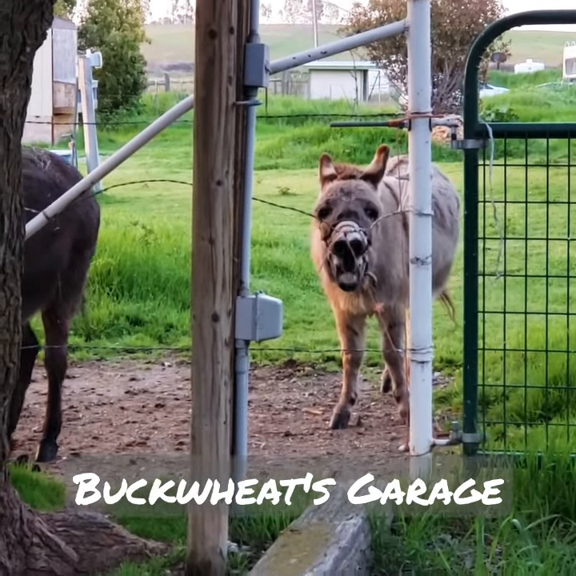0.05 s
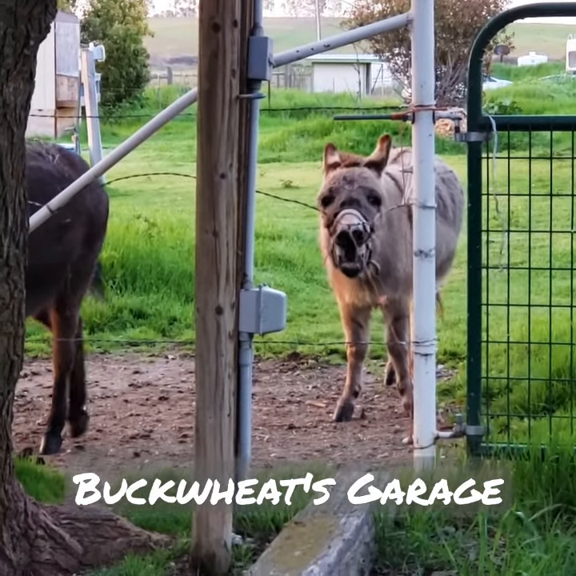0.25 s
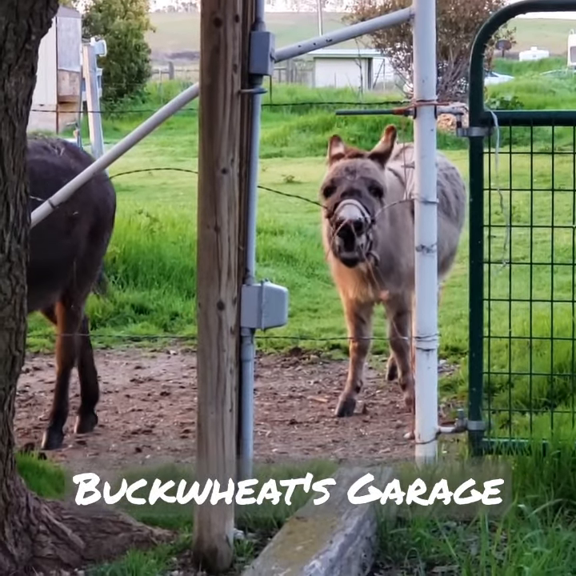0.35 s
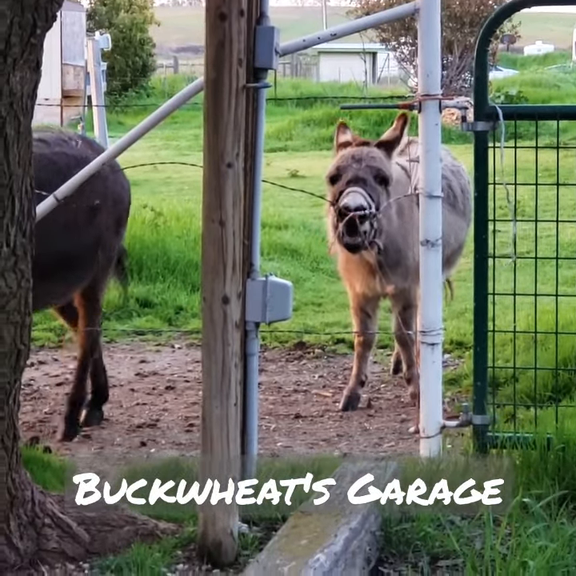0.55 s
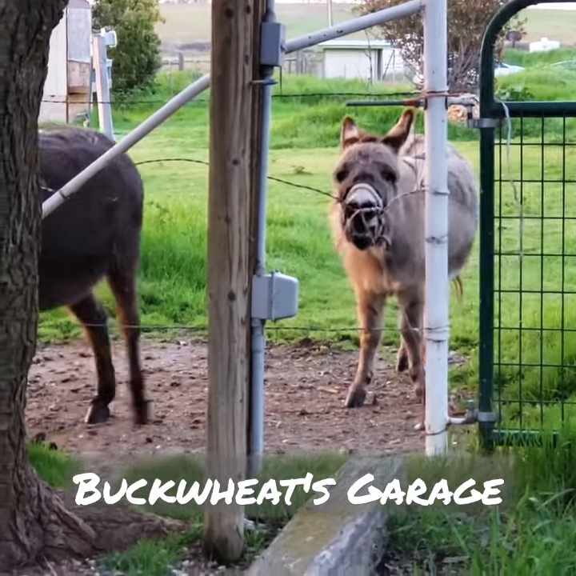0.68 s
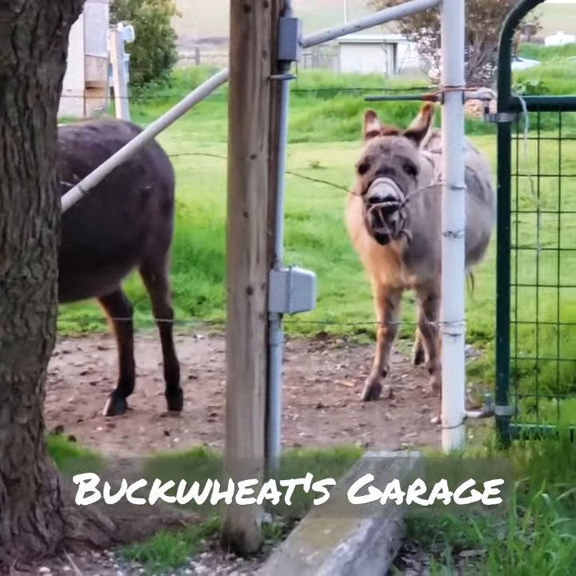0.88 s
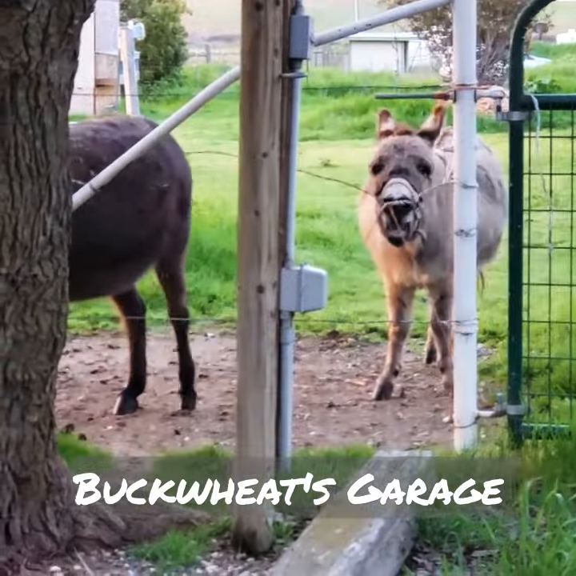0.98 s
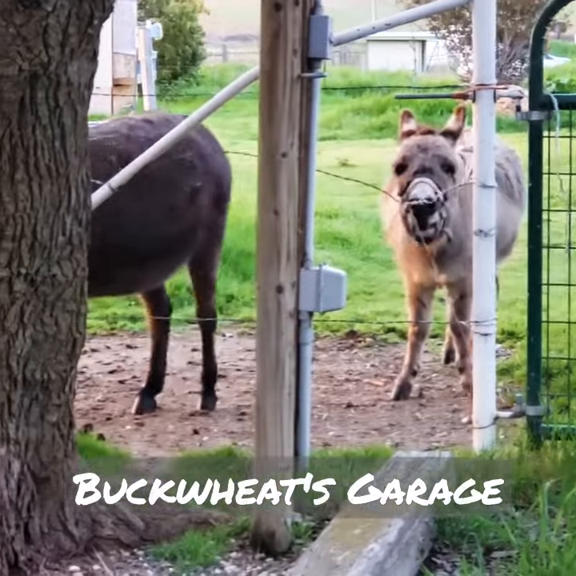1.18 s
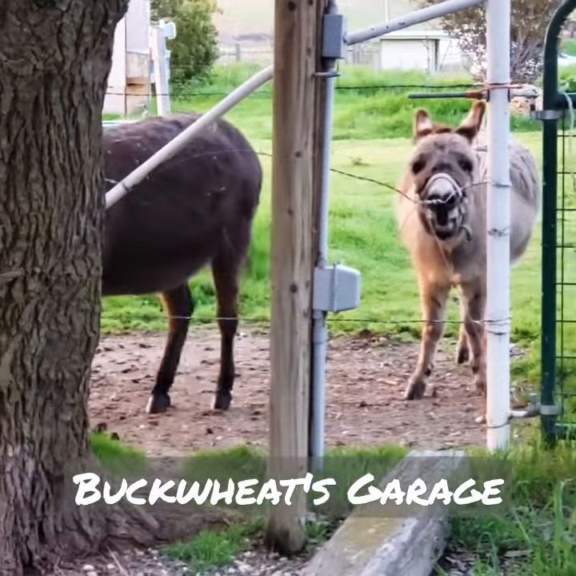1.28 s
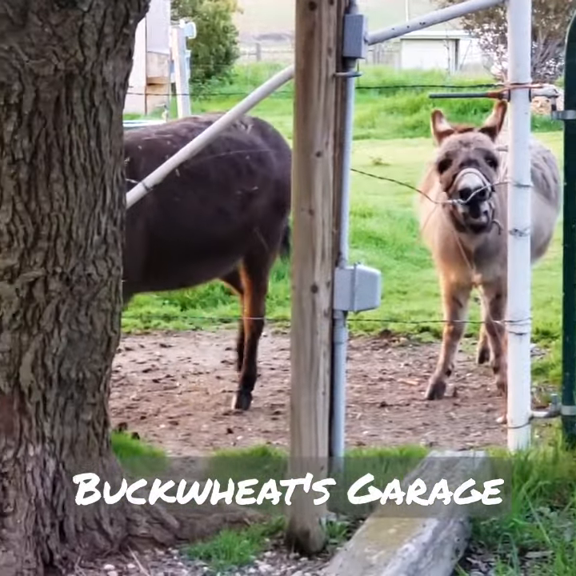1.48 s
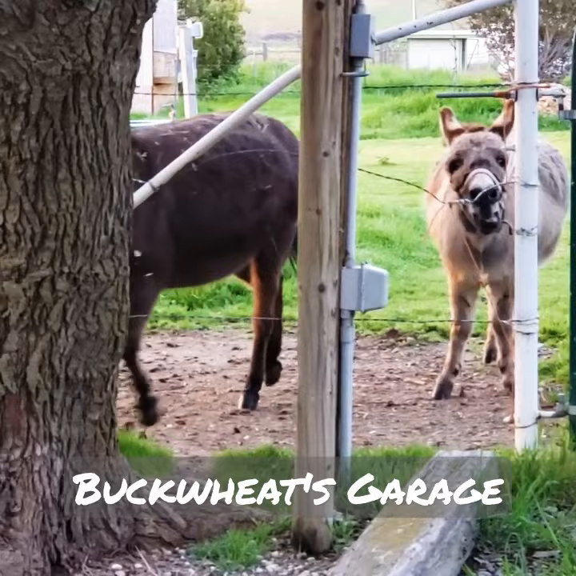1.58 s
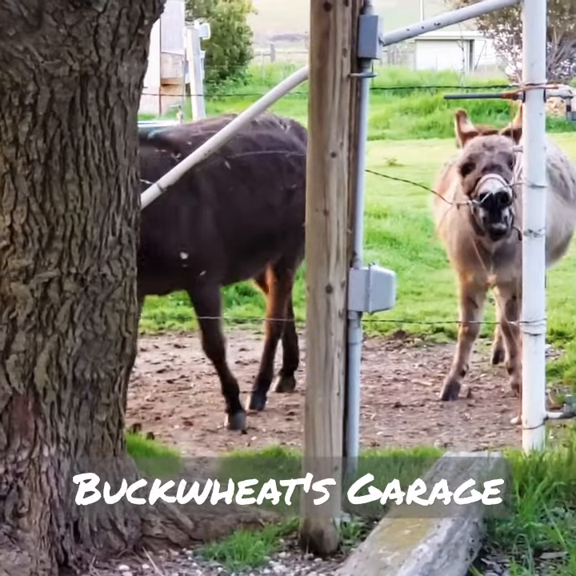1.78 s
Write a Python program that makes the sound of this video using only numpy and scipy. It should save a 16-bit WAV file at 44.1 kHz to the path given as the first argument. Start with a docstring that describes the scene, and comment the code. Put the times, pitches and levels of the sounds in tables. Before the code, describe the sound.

A donkey brays a few metres away in an open paddock. A short grunt leads into a loud, rough haw, a shrill wheezing in-breath and a longer haw, with a faint echo and a low outdoor rumble.

```python
"""A donkey brays in an open paddock, a few metres away: a short grunt, a haw, a shrill hee, a longer haw.
In each haw the vocal folds start slack, jump to a pressed register where every second cycle differs,
then drop back. The hee is breath drawn in: two throat whistles that grow hoarse over rushing air.
Sheds and trees give a faint echo, and a low rumble lies beneath."""
import sys
import numpy as np
from scipy import signal
from scipy.fft import rfft, irfft, next_fast_len
from scipy.io import wavfile

SR = 44100
rng = np.random.default_rng(int(sys.argv[2]) if len(sys.argv) > 2 else 0)


def transcribe(u):
    """Save the signal u as a 16-bit wav file named by the first command-line argument.

    u: samples, shape (n,) or (channels, n), limited to [-1, 1]; the rate is SR.
    q: integer samples, one column per channel.
    """
    v = np.clip(np.atleast_2d(u).T, -1, 1)
    q = np.round(v * 32767).astype(np.int16)
    wavfile.write(sys.argv[1], SR, q)


N = 81585
T = np.arange(N) / SR


def from_db(db):
    """Decibels to gain."""
    return 10 ** (np.asarray(db) / 20)


def unit_rms(x):
    """Scale to unit level."""
    return x / np.sqrt(np.mean(x ** 2) + 1e-20)


def automation(rows):
    """Draw one line per column through the breakpoints, at every sample."""
    times, *columns = np.transpose(rows)
    return [np.interp(T, times, column) for column in columns]


def gate(rows, fade_s=0.003):
    """Fade in after a table's first time and out before its last."""
    times = np.reshape(rows, (len(rows), -1))[:, 0]
    return np.clip(np.minimum(T - times[0], times[-1] - T) / fade_s, 0, 1)


def at_hz(points, hz):
    """Read a curve on a log-frequency axis."""
    freqs, values = np.transpose(points)
    return np.interp(np.log(np.maximum(hz, 1)), np.log(freqs), values)


def filtered(x, response):
    """Apply a frequency response, given as a function of Hz."""
    size = next_fast_len(2 * N)
    hz = np.arange(size // 2 + 1) * SR / size
    return irfft(rfft(x, size) * response(hz), size)[..., :N]


def coloured(x, eq):
    """Shape a signal with an EQ curve, then bring it to unit level."""
    return unit_rms(filtered(x, lambda hz: from_db(at_hz(eq, hz))))


def drift(rate_hz):
    """Smooth random wobble at unit level."""
    return unit_rms(filtered(rng.standard_normal(N), lambda hz: 1 / (1 + (hz / rate_hz) ** 4)))


def shaky_phase(hz, jitter, rate_hz):
    """Phase of an oscillator whose pitch trembles."""
    return 2 * np.pi * np.cumsum(hz * (1 + jitter * drift(rate_hz))) / SR


# The rumble's tone. Each row: frequency in Hz, relative level in dB.
RUMBLE_EQ = [(25, -19), (62, 4.5), (140, -13), (700, -29.5), (2000, -23.5), (16000, -52)]


def rumble(level_db=-57.5, width=0.63):
    """A low outdoor bed, mostly shared by left and right."""
    air = rng.standard_normal(N) + width * rng.standard_normal((2, N))
    return from_db(level_db + 0.5 * drift(21)) * coloured(air, RUMBLE_EQ)


# The echoes come back dark. Each row: frequency in Hz, gain in dB on top of the send.
ECHO_EQ = [(250, 8), (2200, 1), (5000, -7), (16000, -16.5)]


def paddock_echo(x, send_db=-20, t60_s=0.62, onset_s=0.005, shed_s=.14, shed_db=-13):
    """Scattered echoes from fence and trees, and a distinct slap from a shed."""
    decay = from_db(-60 * T / t60_s) * (1 - np.exp(-T / onset_s))
    echoes = unit_rms(rng.standard_normal((2, N)) * decay) / np.sqrt(N)
    echoes[:, int(shed_s * SR)] += from_db(shed_db)   # relative to the scatter
    wet = signal.fftconvolve(x[None], echoes, axes=1)[:, :N]
    return filtered(wet, lambda hz: from_db(send_db + at_hz(ECHO_EQ, hz)))


# Where haw and hee sit in the image. Each row: frequency in Hz, left minus right in dB.
HAW_PAN = [(330, 4), (1000, 3), (1330, -1.5), (2250, 5), (2650, -5.5), (3000, -2.5), (3600, -11),
           (7200, -0.5), (15000, -5.5)]
HEE_PAN = [(2100, 1), (2750, -8.5), (3100, -3), (3650, -8), (4700, -3.5), (5200, -13.5), (5700, 2),
           (12300, -5), (15200, 5.5)]
# The spread they share. Each row: frequency in Hz, left minus right phase in radians.
STEREO_PHASE = [(600, 0.25), (1300, -1.05), (2200, -1.54), (5200, -0.79), (10500, -1.68)]
# One entry per haw: extra delay of the left side in seconds.
HAW_LAG_S = [-0.0000018, .00001]


def panned(x, pan, lag_s=0):
    """A source reaches left and right with different level and phase."""
    def response(hz):
        phase = at_hz(STEREO_PHASE, hz) - 2 * np.pi * hz * lag_s
        left = from_db(at_hz(pan, hz) / 2) * np.exp(.5j * phase)
        pair = np.array([left, 1 / left])
        return pair / np.maximum(abs(pair.mean(0)), .5)   # holds the centre level
    return filtered(x, response)


# The grunt's envelope. Each row: time in seconds, level in dB.
GRUNT_LEVEL = [(.033, -71.5), (.04, -39), (.053, -38.5), (.07, -44.5), (.094, -51.5)]
# Its throaty tone. Each row: frequency in Hz, relative level in dB.
GRUNT_EQ = [(120, -15.5), (250, -1), (380, -19), (600, -14), (850, -0.5), (1200, -4.5), (1550, -24.5),
            (2100, -6.5), (5200, -21), (16000, -32.5)]


def grunt(flap_hz=401.7, air=0.11):
    """The folds flap unevenly for a moment without finding a pitch."""
    db, = automation(GRUNT_LEVEL)
    flap_count = shaky_phase(flap_hz, jitter=0.15, rate_hz=220) // (2 * np.pi)
    flaps = np.diff(flap_count, prepend=0) * from_db(1.6 * drift(336))
    return gate(GRUNT_LEVEL) * from_db(db) * coloured(flaps + air * rng.standard_normal(N), GRUNT_EQ)


# Chirps at the edges of the haws. Each row: centre in seconds, landing pitch in Hz, level in dB,
# width in seconds, upward glide in Hz.
THROAT_CATCHES = [(0.181, 800, -37, 0.0034, -0.5), (0.53, 1950, -39.5, .005, 122.5),
                  (1.13, 1230, -35, 0.0032, -61.5), (1.757, 1320, -38.5, 0.0028, 59.5),
                  (1.767, 775, -31, 0.01, 119.5)]


def throat_catch(centre_s, landing_hz, db, width_s, glide_hz):
    """A brief sliding note as the throat snaps open or shut."""
    age = (T - centre_s) / width_s
    hz = landing_hz + glide_hz * np.clip(age + .5, -1, 0)
    return from_db(db) * np.sqrt(2) * np.sin(shaky_phase(hz, jitter=0.015, rate_hz=110)) / np.cosh(age)


# The tone of the in-breath. Each row: frequency in Hz, relative level in dB.
WHEEZE_EQ = [(400, -35.5), (950, -14.5), (1450, -24), (1750, -13.5), (2020, 2.5), (2750, -3.5), (3080, 4),
             (3550, -19.5), (4000, 3), (4350, -7), (4800, 2.5), (5400, 0.5), (5950, -11), (6500, -46),
             (7500, -17), (8900, -35), (10400, -21.5), (14200, -22), (15200, -24), (16000, -26.5)]


def wheeze(envelope, roughness=0.21):
    """Inrushing air rings the resonances of throat and mouth."""
    db, = automation(envelope)
    air = rng.standard_normal(N) * (1 + roughness * drift(280))
    return gate(envelope) * from_db(db) * coloured(air, WHEEZE_EQ)


def whistle(curve, jitter=0.0044, flutter=0.057):
    """Air sings in the narrowed throat, fluttering in pitch and strength; returns a rotating phasor."""
    hz, db = automation(curve)
    tremolo = unit_rms(np.abs(1 + flutter * drift(70)))
    phase = shaky_phase(hz, jitter, rate_hz=180)
    return np.sqrt(2) * gate(curve) * from_db(db) * tremolo * np.exp(1j * phase)


def turbulence(share, width_hz=168):
    """A modulator that spreads a share of a tone's power into a noisy band around it."""
    share = np.clip(share, 0, 1)
    return np.sqrt(1 - share) + np.sqrt(share / 2) * (drift(width_hz) + 1j * drift(width_hz))


# The hee's two whistles, and the fading one that opens the scene.
# Each row: time in seconds, pitch in Hz, level in dB.
HIGH_WHISTLE = [(.648, 5840, -48.5), (.661, 5600, -34), (.674, 5350, -18.5), (.69, 5265, -20),
                (.725, 5270, -13.5), (.76, 5168, -14.5), (.803, 5158, -15.5), (.845, 4967, -24.5),
                (.895, 4780, -27), (.94, 4774, -27.5), (.975, 4996, -36), (1.015, 5320, -72)]
LOW_WHISTLE = [(.672, 2734, -42), (.692, 2667, -21), (.705, 2400, -30.5), (.73, 2266, -28.5),
               (.785, 2048, -32), (.84, 2014, -23.5), (.895, 1953, -35.5), (.95, 2383, -34.5),
               (.975, 2340, -71)]
OPENING_WHISTLE = [(0, 5330, -47), (.035, 5250, -51.5), (.16, 5330, -72)]
# The breath under the hee and under the opening whistle. Each row: time in seconds, level in dB.
HEE_BREATH = [(.635, -63), (.675, -39), (.7, -25.5), (.75, -23.5), (.81, -24), (.87, -28), (.935, -28),
              (.965, -37), (.995, -52.5), (1.035, -77)]
OPENING_BREATH = [(0, -43.5), (.03, -53.5), (.08, -52.5), (.16, -77.5)]
# The high whistle breaks up as breath runs out. Each row: time in seconds, noisy share from 0 to 1.
HOARSENESS = [(.69, 0.1), (.71, 0.4), (.805, 0), (.84, 0.3)]
# Octave, twelfth and sum tone. Each row: mix gain in dB, width of the rasp in Hz.
HEE_OVERTONES = [(-10, 310), (-3.5, 380), (-18.5, 110)]


def hee(overtone_rasp=.85, low_hoarser=3):
    """Two hoarse whistles and their overtones ride the in-breath; an earlier hee dies away at the start."""
    high, low = whistle(HIGH_WHISTLE), whistle(LOW_WHISTLE, jitter=0.0179)
    hoarse, = automation(HOARSENESS)
    _, high_db = automation(HIGH_WHISTLE)
    # Ring modulation makes the overtones swell faster than the whistle itself.
    swing = np.sqrt(2) * from_db(high_db) * np.exp(1j * np.angle(high))
    low_swing = abs(swing) * gate(LOW_WHISTLE) * np.exp(1j * np.angle(low))
    overtones = sum(from_db(gain_db) * high * partner * turbulence(overtone_rasp, width_hz)
                    for (gain_db, width_hz), partner in zip(HEE_OVERTONES, (swing, swing ** 2, low_swing)))
    tones = high * turbulence(hoarse) + low * turbulence(low_hoarser * hoarse) + overtones
    opening = whistle(OPENING_WHISTLE) * turbulence(0.3)
    return (tones + opening).real + wheeze(HEE_BREATH) + wheeze(OPENING_BREATH)


# Cues for the two haws. Each row: start, jump up, drop back and end, all in seconds.
HAW_CUES = [(0.174, 0.182, 0.44, .532), (1.124, 1.166, 1.564, 1.763)]
# Each haw's pressed stretch. Each row: pitch in Hz, sag in Hz per second, scoop from below in Hz,
# level in dB, swell in dB per second, softening of the attack in dB.
PRESSED_NOTES = [(699.8, 215, 72, -19, -4, 10), (677.5, 103, 35.6, -23, -1.5, 1)]
# Its slack stretch. Each row: pitch in Hz, sag in Hz per second, level in dB, fade in dB per second.
SLACK_NOTES = [(581.4, 68, -24, 146), (572, 170, -31.5, 50.5)]


def vocal_effort(which, break_s=0.0025, settle_s=0.02068, lift_hz=83, lift_s=0.025):
    """The folds' register (0 slack, 1 pressed), pitch and level through one haw."""
    start, up, down, end = HAW_CUES[which]
    top_hz, sag, scoop_hz, top_db, swell, soft_db = PRESSED_NOTES[which]
    slack_hz, slack_sag, slack_db, fade = SLACK_NOTES[which]
    t = np.clip(T, start, end)
    pressed = (np.tanh((t - up) / break_s / 2) - np.tanh((t - down) / break_s / 2)) / 2
    since_up, since_down = np.maximum(t - up, 0), np.maximum(t - down, 0)
    unsettled = np.exp(-since_up / settle_s)
    high_hz = top_hz - sag * since_up - scoop_hz * unsettled
    closing_hz = lift_hz * np.exp((t - end) / lift_s)   # pitch lifts as the throat closes
    low_hz = slack_hz - slack_sag * since_down + closing_hz
    hz = pressed * high_hz + (1 - pressed) * low_hz
    db = pressed * (top_db + swell * since_up) + (1 - pressed) * (slack_db - fade * since_down)
    return pressed, hz, db - soft_db * unsettled


# Each haw's grit. Each row: time in seconds, gain of the half-pitch lines in dB, rasp against tone in dB.
FIRST_GRIT = [(0.18, -15.5, -5.5), (0.193, -17.5, -24), (0.212, -25, -16), (0.224, -3.5, -9),
              (.29, 4, -23.5), (0.422, -5.5, -19.5), (0.434, -12.5, -6), (0.465, 6.5, -19),
              (0.505, -12.5, -6.5)]
SECOND_GRIT = [(1.13, -24, -8), (1.151, 2, -9), (1.182, -22, -5), (1.214, -1.5, -12), (1.243, 1.5, 2),
               (1.269, 2.5, -12), (1.551, -4.5, -23.5), (1.571, -4.5, -2.5), (1.611, -8.5, -19.5),
               (1.675, 5.5, -10), (1.71, -8, -15.5), (1.755, -6, -15)]
# Relative levels in dB at 1, 2, 3 ... times half the pitch: a pressed row per haw, one slack set for both.
PRESSED_PARTIALS = [
    [-12.5, -9.5, -5.5, 0, -20, -5.5, -23.5, -20, -24.5, -23, -32.5, -54.5],
    [-9.5, -5, -5.5, 0, -24, -5, -20.5, -29.5, -18, -24.5, -37, -38.5],
]
SLACK_PARTIALS = [-18.5, 4.5, -1, 4.5, -11, 1, -3.5, -3.5, -37, -27, -19, -21]
# Throat rasp and the hiss of outgoing air. Each row: frequency in Hz, relative level in dB.
RASP_EQ = [(430, -18), (600, -8), (850, 7.5), (1040, -13.5), (1220, 9), (1400, -3.5), (1560, -14),
           (1900, 5.5), (2350, -0.5), (2800, -12), (3200, -8), (3700, -25), (4400, -18.5), (6000, -41),
           (9000, -63)]
HISS_EQ = [(2500, -44.5), (3600, -9.5), (4100, -11), (4650, 4), (4950, -4), (5300, 7), (6100, -18),
           (7250, 0), (8700, -16.5), (12000, -0.5), (16000, -13.5)]
# One entry per haw: hiss level in dB where the voice is loudest.
HISS_DB = [-47, -52.5]
MOUTH_HZ, MOUTH_WIDTH_HZ, MOUTH_DB = 2916, 88, 8   # a brassy resonance the sagging overtones slide into
BRIGHTEN_DB_PER_S = 7   # per octave: the half-pitch lines grow brassier while pressed


def haw(which, grit, jitter=0.024, shimmer=0.088, slip_rad=0.68, buzz_db=-24.5, hiss_follow=0.64):
    """Folds beat in alternating cycles, adding half-pitch lines; each cycle puffs out rasp and hiss."""
    pressed, hz, db = vocal_effort(which)
    slack = 1 - pressed
    halves_db, rasp_db = automation(grit)
    rough = from_db(rasp_db)
    phase = shaky_phase(hz, jitter * rough, rate_hz=206)
    tilt_db = pressed * BRIGHTEN_DB_PER_S * (T - np.mean(HAW_CUES[which][1:3]))
    tone, power = 0, 0
    for k, (pressed_db, slack_db) in enumerate(zip(PRESSED_PARTIALS[which], SLACK_PARTIALS), 1):
        odd = k % 2   # the half-pitch lines
        mouth_db = MOUTH_DB / (1 + (2 * (k * hz / 2 - MOUTH_HZ) / MOUTH_WIDTH_HZ) ** 2)
        odd_db = odd * (halves_db + tilt_db * np.log2(k / 2))
        gain = from_db(pressed * pressed_db + slack * slack_db + mouth_db + odd_db)
        slip = odd * slack * slip_rad * drift(37)   # slack folds slip out of their alternation
        tremolo = 1 + shimmer * rough * drift(70)
        tone += gain * tremolo * np.cos(k * phase / 2 + slip + rng.uniform(-np.pi, np.pi))
        power += gain ** 2 / 2
    reedy_buzz = sum(np.cos(k * phase + rng.uniform(-np.pi, np.pi)) for k in range(7, 10))
    tone += from_db(buzz_db) * slack * reedy_buzz
    alternation = 1 + .5 * np.minimum(from_db(halves_db), 1) * np.cos(phase / 2)
    puffs = (1 + np.cos(phase)) * alternation
    rasp = rough * coloured(puffs * rng.standard_normal(N), RASP_EQ)
    voice = from_db(db) * (tone / np.sqrt(power) + rasp) / np.sqrt(1 + rough ** 2)
    hiss_gain = from_db(HISS_DB[which] + hiss_follow * (db - db.max()))
    hiss = hiss_gain * coloured((1 + puffs) * rng.standard_normal(N), HISS_EQ)
    return gate(HAW_CUES[which], fade_s=0.012) * (voice + hiss)


def scene():
    """The bray up front, with the paddock's echo and rumble behind it."""
    first_haw, second_haw = haw(0, FIRST_GRIT), haw(1, SECOND_GRIT)
    throat = grunt() + sum(throat_catch(*row) for row in THROAT_CATCHES)
    in_breath = hee()
    direct = (panned(first_haw + throat, HAW_PAN, HAW_LAG_S[0])
              + panned(second_haw, HAW_PAN, HAW_LAG_S[1])
              + panned(in_breath, HEE_PAN))
    return direct + paddock_echo(first_haw + second_haw + throat + in_breath) + rumble()


def record(dry):
    """Soft-clip the highest peaks and cut the top end steeply."""
    cutoff_hz = 15900
    rounded = dry / (1 + np.abs(dry) ** 6) ** (1 / 6)
    return filtered(rounded, lambda hz: 1 / np.sqrt(1 + (hz / cutoff_hz) ** 300))


dry = scene()
out = record(dry)
transcribe(out)
```